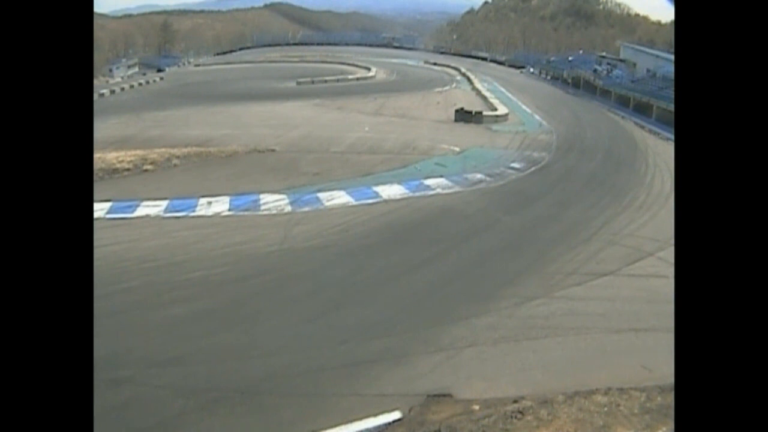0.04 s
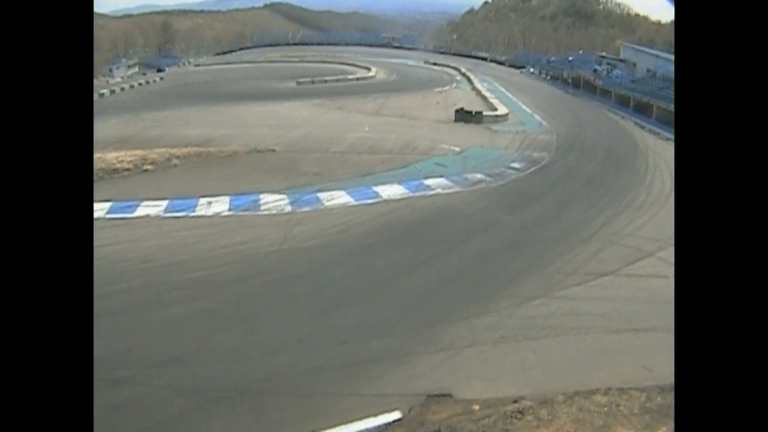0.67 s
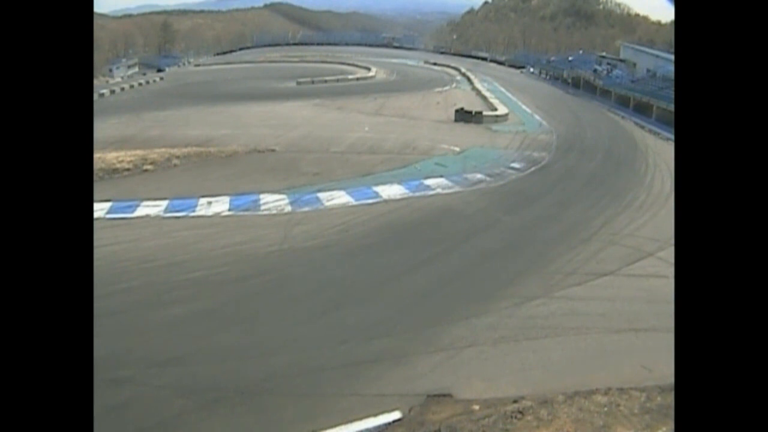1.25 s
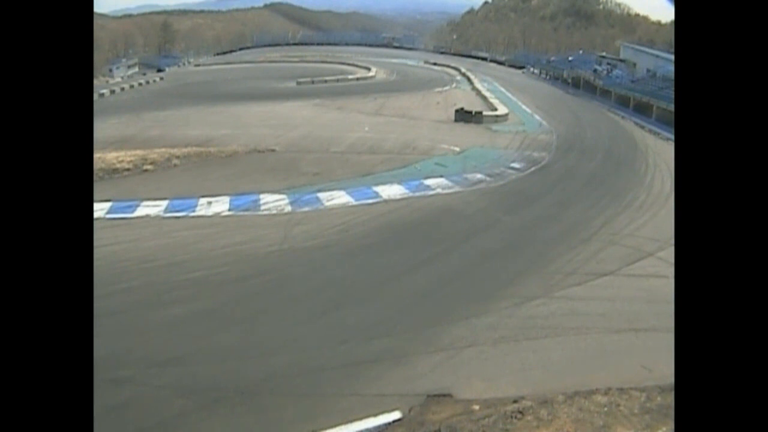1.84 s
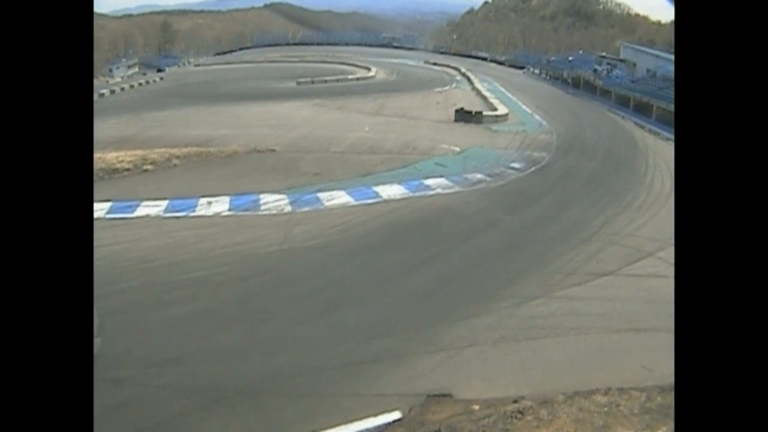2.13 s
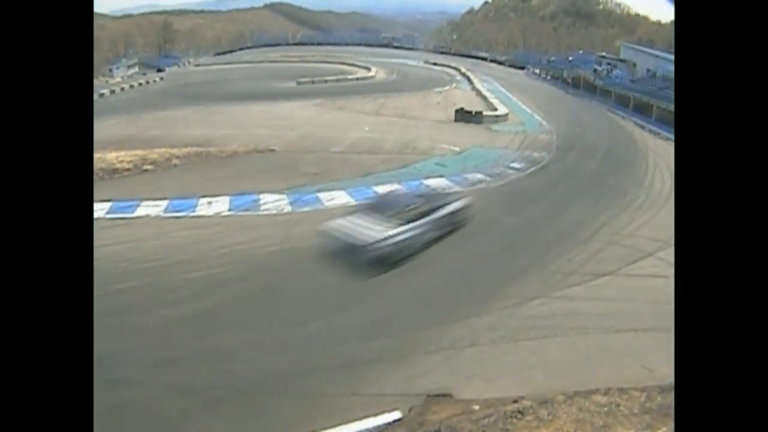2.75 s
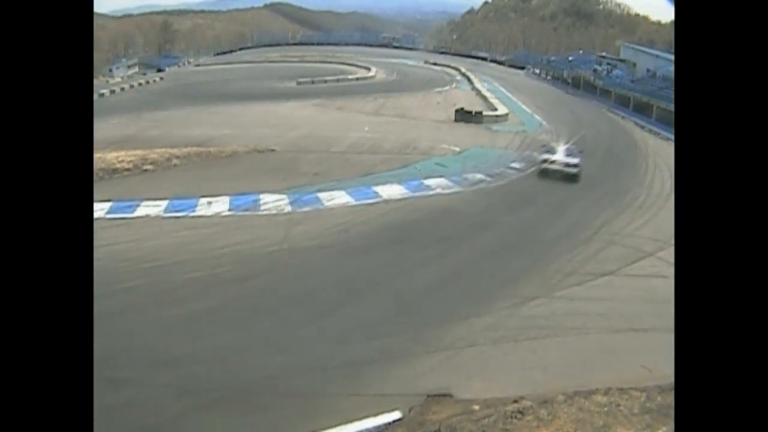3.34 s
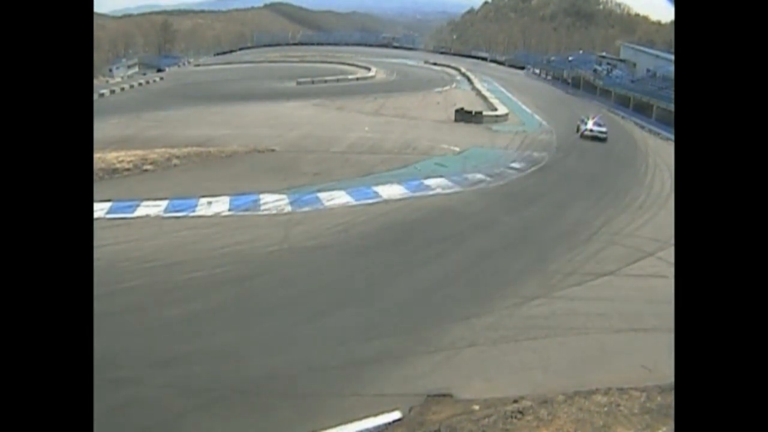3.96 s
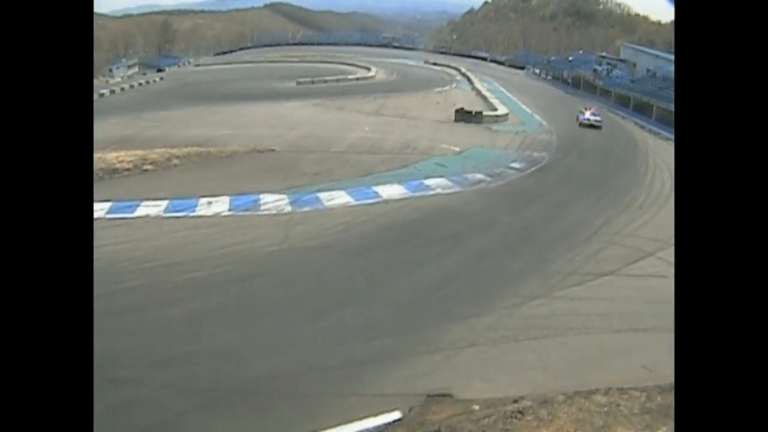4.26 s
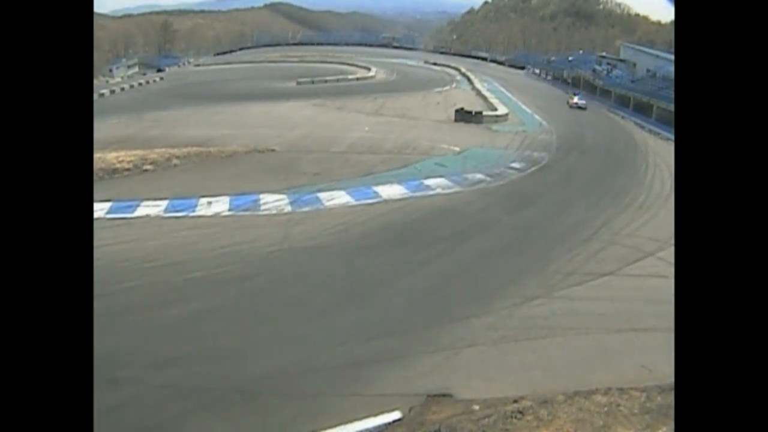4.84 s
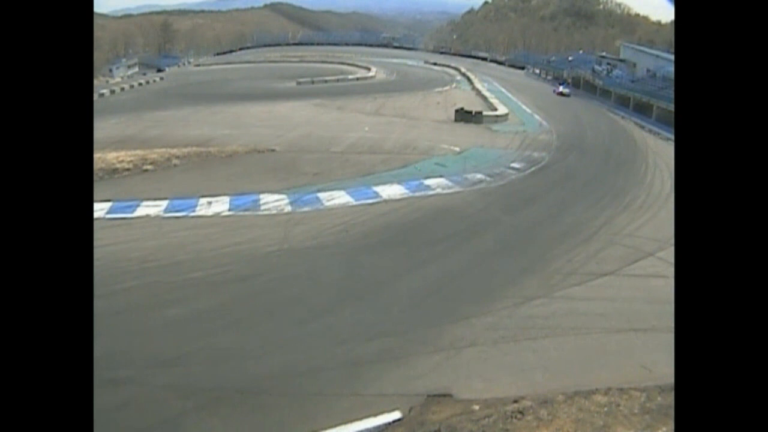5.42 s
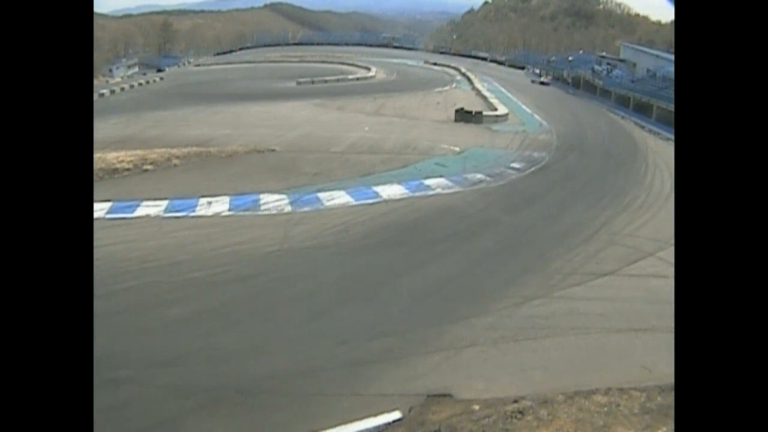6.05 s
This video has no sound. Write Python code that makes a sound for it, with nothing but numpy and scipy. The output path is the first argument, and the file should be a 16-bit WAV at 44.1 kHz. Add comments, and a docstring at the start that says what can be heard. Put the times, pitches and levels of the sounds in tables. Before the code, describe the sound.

Tyres howl and squeal as a revving car slides past on a circuit, its exhaust popping while it powers away.

```python
"""A six-cylinder drift car on an open circuit, from a fixed stereo microphone about 9 m off its line.
It approaches with tyres scrubbing, howling and squealing as they stick and slip, another car droning far
off. At 3 s it passes, exhaust pulses booming and rasping, pops twice and powers away. Near 4.8 s the
throttle shuts and unburnt fuel backfires in the pipe; it revs again and the rear tyres chirp at 6 s.
Throughout, barriers echo it faintly over a light breeze; the loudest peaks overload the microphone."""
import sys
import numpy as np
from scipy import signal
from scipy.fft import rfft, irfft, next_fast_len
from scipy.io import wavfile
from scipy.ndimage import uniform_filter1d

SR = 44100
rng = np.random.default_rng(int(sys.argv[2]) if len(sys.argv) > 2 else 0)


def generate_wav(sig):
    """Save sig (samples, or channels by samples) to the path in sys.argv[1] as 16-bit PCM at SR."""
    pcm = np.round(np.clip(np.atleast_2d(sig).T, -1, 1) * 32767).astype(np.int16)
    wavfile.write(sys.argv[1], SR, pcm)


N = 268569
T = np.arange(N) / SR
NEAREST_S, NEAREST_M, SPEED_M_S = 3.025, 9.13, 16.43  # the pass by the microphone

# engine speed as heard at the microphone: (time [s], pulse rate of one cylinder bank [Hz])
BANK_RATE = [(0, 119.1), (.56, 112.3), (1.02, 93.85), (1.29, 88.85), (1.41, 101), (1.56, 107.2),
             (1.78, 110), (2.02, 103.1), (2.14, 110.8), (2.34, 108.8), (2.47, 120.5), (2.62, 122.9),
             (2.75, 129.5), (2.83, 137.3), (2.95, 143.2), (3.14, 138.6), (3.22, 124.9), (3.31, 123.8),
             (3.41, 128.8), (3.53, 139.4), (3.73, 138.9), (3.88, 145), (4.07, 142.5), (4.56, 136.2),
             (4.8, 145.8), (4.88, 125.2), (5.02, 118.1), (5.33, 123.1), (5.44, 98.74), (5.72, 103),
             (5.91, 159.9), (6.0, 133.5), (6.09, 131.9)]
# throttle presses: (down [s], up [s], load [1 = hard acceleration])
THROTTLE_PRESSES = [(0.304, 1.2, 0.22), (1.281, 3.087, 0.97), (3.225, 4.145, 0.82), (4.152, 4.65, 0.75),
                    (4.651, 4.779, 1.265), (5.42, 5.755, 1.02), (5.749, 5.952, 1.3), (5.946, 6.101, 0.82)]
# spells where the exhaust burble and engine tones swell or dip:
# (start [s], end [s], burble change [dB], tone change [dB])
BURBLE_AND_TONE_SWELLS = [(-.1, 0.443, 2.5, 5), (2.22, 2.42, 10.5, 1), (2.42, 2.56, 3.5, -2.5),
                          (2.801, 2.95, 6, -2), (2.947, 3.129, 12, -4), (3.132, 3.225, 8, -17.5),
                          (3.21, 3.297, -1, -5), (4.79, 4.861, -2, -11.5), (5.04, 5.323, 2, -9),
                          (5.323, 5.47, 8, -6.5), (5.743, 6.1, 6.5, 0)]
# weak lines left by unequal cylinders: (order [multiple of the cycle rate], relative level [dB])
WEAK_ORDERS = [(2,-11),(4,-18.5),(5,-23.5),(7,-10.5),(8,-11),(10,-12.5),(11,-12),(13,-14.5),(14,-25),(15,-11),(16,-29.5)]
# standing waves in the pipe: (centre [Hz], width [Hz], lift [dB])
PIPE_WAVES = [(186, 20, 9), (285.3, 24, 12), (381.7, 62, 16)]
# exhaust parts: (base level [dB], change off throttle [dB], change with the pipe facing away [dB],
# swing towards the microphone [s], distance loss [factor], standing-wave lift [factor])
THROB = (-27.5, 1, -10.5, 2.5, 0.81, 1)
FIRING = (-18.5, -12.5, 0, 4, 1.005, 0.5217)
BOOM = (-17, -4, -8, 2.5, 1.3755, 1)
OCTAVE = (-26.5, -7.5, -22.5, 1.87, 0.86, 1.2352)
RASPING = (-19.5, -6.5, -10, 2.5, 1.6346, -1.5)
BURBLING = (-27, -0.5, -8.5, 2.5, 0.16, 0)
# backfires: (time [s], base level [dB], relative crack level [dB], gas decay [s])
BACKFIRES = [(1.261,-33.5,-24.5,0.046),(3.114,-16,-11,0.016),(3.227,-14,-10,0.017),(5.045,-13.5,-20.5,0.0097),(5.109,-16.5,-5.5,0.019),(5.117,-2,-2,0.018),(5.354,-22.5,-7.5,0.05),(5.414,-11.5,-7.5,0.029)]
# tyre slides: (start [s], end [s], base scrub level [dB], base hiss level [dB])
SLIDES = [(-.1, .2, -19, -35.5), (.52, 1.46, -29, -37), (1.391, 2.15, -18.5, -36.5),
          (2.41, 2.95, -24, -39.5), (2.948, 4.237, -25, -40.5), (4.25, 4.78, -37, -40.5),
          (5.78, 6.1, -14, -30.5)]
# tyre tones at the microphone: (start [s], length [s], first pitch [Hz], settled pitch [Hz], level [dB])
HOWLS = [(-.08, 0.22, 735, 680, -32.5), (0.468, 0.53, 709, 618.6, -34.5), (1.003, .65, 615, 593.7, -34),
         (1.802, 0.3, 735, 705.6, -38.5), (1.87, 0.022, 725, 715.7, -24.5), (1.957, 0.059, 715, 699, -28)]
SQUEALS = [(0.498, 0.42, 1323, 1197, -33.5), (0.879, 0.23, 1201, 1197, -29), (1.135, .54, 1203, 1181, -36),
           (1.72, 0.39, 1225, 1329, -38), (3.106, 0.024, 1140, 1154, -21.5),
           (3.175, 0.026, 1222, 1234, -21.5), (3.22, .44, 1117, 1289, -30), (5.932, .17, 890, 920, -28.5)]
CHIRPS = [(5.986, 0.027, 950, 985, -24.5), (5.997, 0.021, 977, 995, -24)]
# wind gusts at the microphone: (start [s], end [s], level [dB])
GUSTS = [(0.068, .38, -42), (2.096, 2.693, -46.5), (2.978, 3.15, -39.5), (5.636, 6.1, -44)]
# spectra of pipe, rasp, backfire crack, tyre scrub, tread hiss and wind: (frequency [Hz], level [dB])
PIPE_COLOUR = [(60,-27.5),(130,-11.5),(200,-9),(290,-3.5),(370,5),(425,3.5),(480,-10.5),(600,-8),(700,-18.5),(950,-27.5),(1500,-44),(3000,-73)]
RASP_COLOUR = [(300,-25.5),(520,-7.5),(700,-9.5),(820,-12.5),(930,4),(1030,-12.5),(1170,0.5),(1400,-13.5),(1600,-24),(2100,-24),(3000,-28),(5000,-49),(9000,-68)]
CRACK_COLOUR = [(300,-21.5),(650,-22),(900,-6.5),(1200,11),(1400,-1),(1600,-12.5),(2200,-13.5),(3300,-30.5),(5000,-39.5),(10000,-55.5)]
SCRUB_COLOUR = [(350,-32),(550,-7.5),(660,1.5),(790,5),(950,-15),(1100,2.5),(1250,4.5),(1450,1),(1650,-15.5),(1900,-30.5),(2600,-56)]
HISS_COLOUR = [(1200,-34),(1650,2),(1880,-2.5),(2120,3),(2400,-8.5),(2800,-8.5),(3400,-16),(4200,-22),(5000,-34.5),(6500,-36),(10000,-52.5)]
BREEZE_COLOUR = [(15,-0.5),(38,-5.5),(65,0),(110,-2.5),(200,-8.5),(500,-18.5),(1500,-33.5),(4000,-49.5)]


def exhaust():
    """Six cylinders fire once each per four-stroke cycle; the tones and burble swell or dip in spells."""
    cycle_hz = np.interp(T, *np.transpose(BANK_RATE)) / 3
    cycle = np.cumsum(cycle_hz * (1 + .002 * walk(60))) / SR
    tones_db, burble_db = 0, exhaust_db(BURBLING)
    for start, end, burble_change_db, tone_change_db in BURBLE_AND_TONE_SWELLS:
        spell = gate(start, end, attack_s=0.046, release_s=0.046)
        burble_db += burble_change_db * spell
        tones_db += tone_change_db * spell
    tones = exhaust_tones(cycle, cycle_hz) * undb(tones_db)
    return tones + exhaust_rasp(cycle, cycle_hz) + exhaust_burble(cycle, burble_db)


def exhaust_tones(cycle, cycle_hz):
    """Two banks of three: four strong lines crest at each bank pulse; unequal cylinders add weak ones."""
    orders, parts = (3, 6, 9, 12), (THROB, FIRING, BOOM, OCTAVE)
    levels_db = [exhaust_db(part, k * cycle_hz) for part, k in zip(parts, orders)]
    strong = sum(undb(db) * line(cycle, k, waver_db=1.11, turn=0) for k, db in zip(orders, levels_db))
    weak = 0
    for order, db in WEAK_ORDERS:
        gain = undb(db) * response(order * cycle_hz, PIPE_COLOUR)
        weak += gain * line(cycle, order, waver_db=3, turn=rng.random())
    _, firing_db, boom_db, _ = levels_db
    return strong + weak * undb(0.57 * firing_db + 0.37 * boom_db - 3)


def exhaust_rasp(cycle, cycle_hz):
    """Steep pulse fronts give a comb of upper lines; a puff of gas follows each bank pulse."""
    comb = 0
    for order in range(14, 43):
        off_bank_db = -6 if order % 3 else 0
        gain = undb(off_bank_db) * response(order * cycle_hz, RASP_COLOUR)
        comb += gain * line(cycle, order, waver_db=3.5, turn=rng.random())
    bank_phase = cycle * 3 % 1
    puffs = np.exp(-bank_phase / 0.67) * (1 + 0.16 * np.sin(2 * np.pi * cycle))
    gas = colour(puffs * spread(width=0.24), RASP_COLOUR)
    rasp = undb(-2) * unit(comb) + undb(-13) * unit(gas)
    return rasp * undb(exhaust_db(RASPING) + 0.24 * walk(7.9))


def exhaust_burble(cycle, burble_db):
    """Firings of random strength ring the pipe."""
    firings = np.diff(np.floor(cycle * 6), prepend=0)
    return unit(colour(firings * noise(), PIPE_COLOUR)) * undb(burble_db - 0.5)


def exhaust_db(part, hz=0):
    """Level of one exhaust part from throttle, heading, distance and the pipe's standing waves."""
    base_db, shut_db, away_db, swing_s, distance_factor, lift_factor = part
    load = sum(amount * gate(down, up, attack_s=0.011, release_s=0.026)
               for down, up, amount in THROTTLE_PRESSES)
    facing_away = (1 - np.tanh((T - swing_s) / 0.096)) / 2
    lift_db = sum(db / (1 + (2 * (hz - centre) / width) ** 2) for centre, width, db in PIPE_WAVES)
    source_db = base_db + shut_db * (1 - load) + lift_factor * lift_db
    return source_db + away_db * facing_away + distance_factor * distance_db()


def backfires():
    """Unburnt fuel goes off in the exhaust: a pulse cracks and rings the pipe; turbulent gas follows."""
    booms, cracks = 0, 0
    for start, db, crack_db, decay_s in BACKFIRES:
        age = np.maximum(T - start, 0)
        rise = age / .00008
        blast = rise * np.exp(-rise)
        gas = noise() * (1 - np.exp(-age / 0.006)) * np.exp(-age / decay_s)
        booms += undb(db) * (undb(10) * blast + undb(3) * gas)
        cracks += undb(db + crack_db) * (undb(13) * blast + undb(-10.5) * gas)
    return colour(booms, PIPE_COLOUR) + colour(cracks, CRACK_COLOUR)


def tyres():
    """Rubber scrubs and hisses in judders over the asphalt, and breaks into howls, squeals and chirps."""
    scrub_gain, hiss_gain = undb(-35.5), undb(-50)  # plain rolling
    for start, end, scrub_db, hiss_db in SLIDES:
        slip = gate(start, end, attack_s=0.16, release_s=0.038)
        scrub_gain += undb(scrub_db) * slip
        hiss_gain += undb(hiss_db) * slip
    scrub = colour(spread(width=.12), SCRUB_COLOUR) * scrub_gain
    hiss = colour(spread(width=.9), HISS_COLOUR) * hiss_gain
    judder_db = 2.1 * walk(80)
    friction = (scrub + hiss) * undb(distance_db() + judder_db - 4)
    howls = sum(stick_slip(row, [-3, -11, -28.5, -27.5], half_db=-19.5, jitter=.0758) for row in HOWLS)
    squeals = sum(stick_slip(row, [-29], half_db=-13.5, jitter=.018) for row in SQUEALS)
    chirps = sum(stick_slip(row, [-10, -19, -27], half_db=-9, jitter=.038) for row in CHIRPS)
    return friction + howls + squeals + chirps


def stick_slip(row, overtones_db, half_db, jitter):
    """Tread blocks stick and slip unevenly; alternate slips differ, adding a hoarse octave below."""
    start, length, first_hz, settled_hz, db = row
    age = np.maximum(T - start, 0)
    hz = settled_hz + (first_hz - settled_hz) * np.exp(-age / (.33 * length))
    phase = 2 * np.pi * np.cumsum(hz * (1 + jitter * walk(900) + .004 * walk(25))) / SR
    tone = np.sin(phase) + undb(half_db) * walk(150) * np.sin(phase / 2)
    tone += sum(undb(level) * np.sin(k * phase) for k, level in enumerate(overtones_db, start=2))
    slip = gate(start, start + length, attack_s=0.17 * length, release_s=0.02)  # dies as the tyre grips
    return unit(tone * undb(2.9 * walk(110))) * undb(db) * slip


def barriers(car, echo_db, decay_s):
    """Scattered echoes from walls and stands, a little different on each side of the microphone."""
    age = T[:SR // 2]
    arrivals = (rng.random(len(age)) < .01) * (age > .02)
    echoes = rng.standard_normal((2, len(age))) * arrivals * np.exp(-age / decay_s)
    echoes /= np.sqrt(np.sum(echoes ** 2) / 2)
    echoes = echoes.mean(axis=0) + 0.34 * echoes
    return undb(echo_db) * signal.fftconvolve(car, echoes, axes=1)[:, :N]


def breeze():
    """Light wind rumbles at the microphone and swells in gusts."""
    gusts = sum(undb(db) * gate(start, end, attack_s=0.19, release_s=0.19) for start, end, db in GUSTS)
    return colour(spread(width=.11), BREEZE_COLOUR) * (undb(-44.5) + gusts) * undb(1.5 * walk(5.1))


def distant_car(pitch_hz, level_db, leaves_s, fade_s):
    """Another car drones far off until it drives out of hearing."""
    phase = 2 * np.pi * np.cumsum(pitch_hz * (1 + .012 * walk(2))) / SR
    fade = np.exp(-np.maximum(T - leaves_s, 0) / fade_s)
    return unit(np.sin(phase)) * undb(level_db + 2 * walk(44)) * fade


def distance_db():
    """Loss with distance from the microphone, 0 dB when the car is nearest."""
    return -20 * np.log10(np.hypot(1, SPEED_M_S * (T - NEAREST_S) / NEAREST_M))


def line(cycle, order, waver_db, turn):
    """One wavering multiple of the cycle rate, rms near 1; turn is its starting phase in cycles."""
    return np.sqrt(2) * np.cos(2 * np.pi * (order * cycle + turn)) * undb(waver_db * walk(40))


def gate(start, end, attack_s, release_s):
    """Envelope that rises from start, holds, and dies away after end."""
    rise = 1 - np.exp(-np.maximum(T - start, 0) / attack_s)
    return rise * np.exp(-np.maximum(T - end, 0) / release_s)


def colour(x, points):
    """Causal filter with the given spectrum; white noise keeps its power."""
    size = next_fast_len(N + SR // 2)
    gain = unit(response(np.arange(size // 2 + 1) * SR / size, points))
    cepstrum = irfft(np.log(gain), size)
    cepstrum[1:size // 2] *= 2  # fold to minimum phase
    cepstrum[size // 2 + 1:] = 0
    return irfft(rfft(x, size) * np.exp(rfft(cepstrum)), size)[..., :N]


def response(hz, points):
    """Gain of a spectrum at given frequencies."""
    points_hz, db = np.transpose(points)
    return undb(np.interp(np.log(hz + 1e-9), np.log(points_hz), db))


def walk(rate):
    """Smooth random drift with rms 1, about rate turns a second."""
    hold = max(int(SR / rate), 2)
    steps = np.repeat(rng.standard_normal(N // hold + 2), hold)
    return unit(uniform_filter1d(uniform_filter1d(steps, hold), hold)[:N])


def spread(width):
    """Stereo noise; width is side over mid."""
    return noise() + width * noise() * np.array([[1], [-1]])


def noise():
    """White noise."""
    return rng.standard_normal(N)


def undb(db):
    """Decibels to gain."""
    return 10 ** (np.asarray(db) / 20)


def unit(x):
    """Scale to rms 1."""
    return x / np.sqrt(np.mean(x ** 2))


def scene():
    """From trackside: the car, its echoes and the open circuit behind."""
    car = exhaust() + tyres() + backfires()
    echoes = barriers(car, echo_db=-22, decay_s=0.035)
    return car + echoes + breeze() + distant_car(pitch_hz=468, level_db=-48, leaves_s=2, fade_s=.5)


def record(dry):
    """The microphone is a little louder on the left; peaks clip, the preamp hisses and the top is cut."""
    clipped = np.clip(dry * undb([[0.81], [-0.81]]), -1, 1)
    softened = signal.sosfilt(signal.butter(1, 13000, fs=SR, output="sos"), clipped)
    preamp_hiss = undb(-64) * spread(width=0.26)
    top_cut = signal.ellip(10, .1, 80, 15800, fs=SR, output="sos")
    return signal.sosfilt(top_cut, softened + preamp_hiss)


dry = scene()
out = record(dry)
generate_wav(out)
```